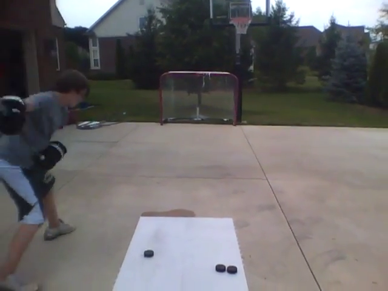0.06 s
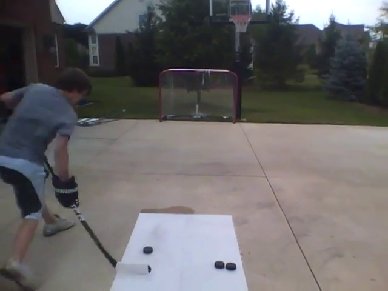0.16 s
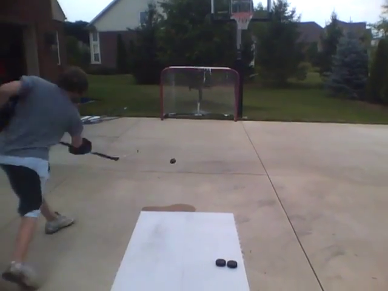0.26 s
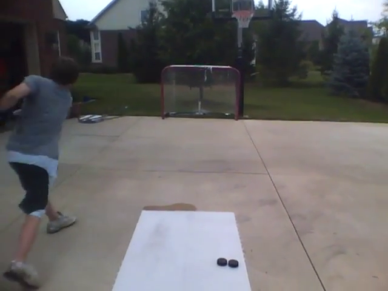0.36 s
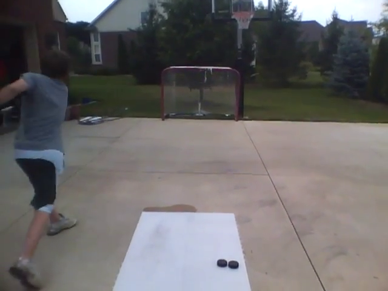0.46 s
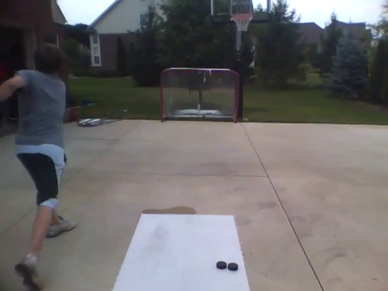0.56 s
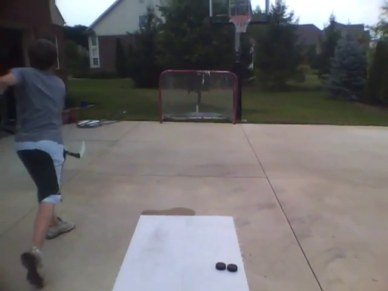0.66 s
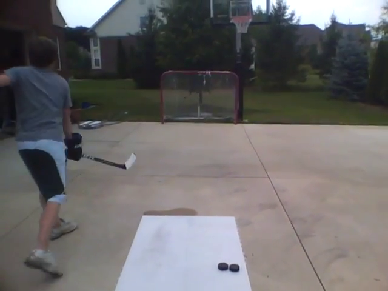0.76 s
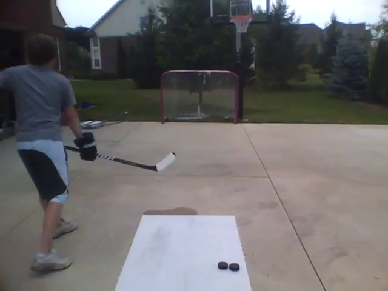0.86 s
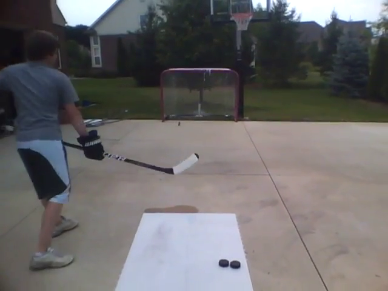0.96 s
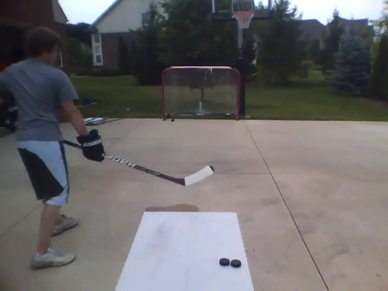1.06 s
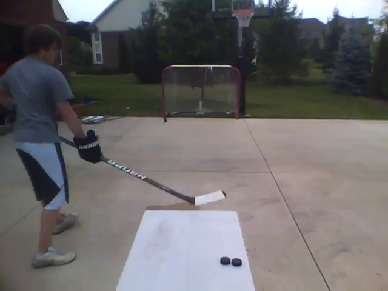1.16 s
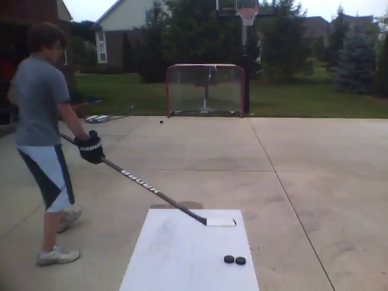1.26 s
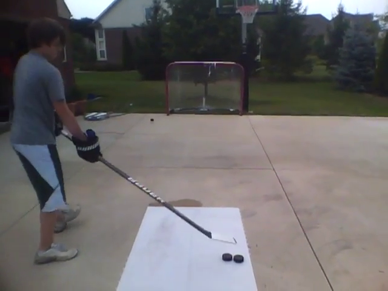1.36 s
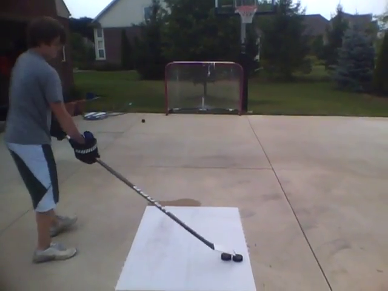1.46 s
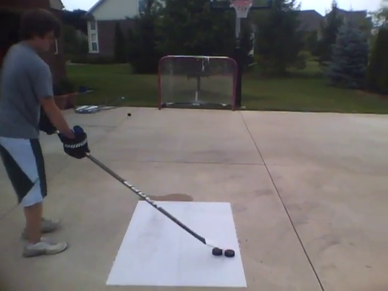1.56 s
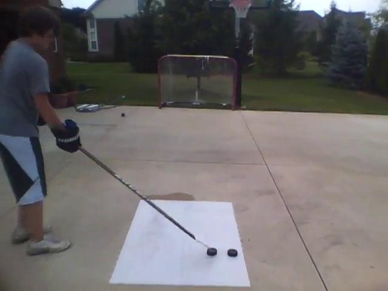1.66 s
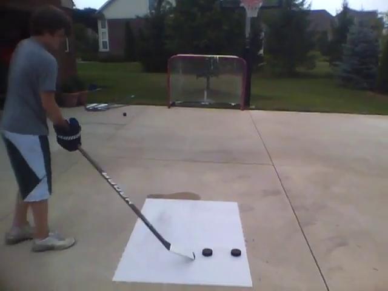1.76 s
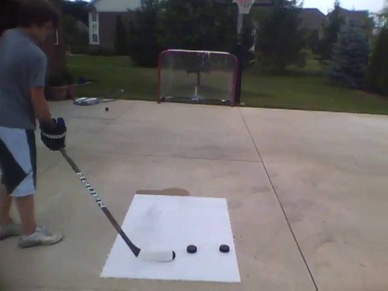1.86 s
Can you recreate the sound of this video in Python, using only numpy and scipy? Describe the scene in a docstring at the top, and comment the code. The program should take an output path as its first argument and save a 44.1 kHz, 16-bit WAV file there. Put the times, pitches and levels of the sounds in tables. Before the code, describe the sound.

A hockey slap shot cracks very loudly and distorts the microphone, ringing off walls and yard; shoes scuff and squeak on concrete, then the blade knocks hollowly on the plastic pad and slides a puck.

```python
"""Driveway: a slap shot cracks off a plastic pad and overloads the input; walls, yard and far houses answer.
Shoes scuff, thud and squeak on the concrete, with sharp clicks and ticks of grit.
Then the blade knocks on the pad, which chatters hollowly, and the next puck slides across it.
Impacts are filtered noise bursts plus decaying sines; friction is grainy noise; air and wind are steady noise."""
import sys
import numpy as np
from scipy import signal
from scipy.io import wavfile
from scipy.ndimage import uniform_filter1d

SR = 44100
rng = np.random.default_rng(int(sys.argv[2]) if len(sys.argv) > 2 else 0)


def master_out(mix):
    """Clip the mix to full scale and print it as 16-bit PCM to the path in sys.argv[1]."""
    frames = np.transpose(np.atleast_2d(mix))
    ceiling = np.clip(frames, -1, 1)
    pcm = np.round(ceiling * 32767).astype(np.int16)
    wavfile.write(sys.argv[1], SR, pcm)


N = 83790
TIME = np.arange(N) / SR


def amp(db):
    """Decibels to gain."""
    return 10 ** (np.asarray(db) / 20)


def noise():
    """White noise of unit variance."""
    return rng.standard_normal(N)


def read(points, hz):
    """Interpolates a table on a log-frequency axis."""
    f, value = np.transpose(points)
    return np.interp(np.log(hz + 1), np.log(f + 1), value)


def add(mix, start_s, sound):
    """Adds a sound into the mix in place, cut at the end."""
    part = mix[max(round(start_s * SR), 0):][:len(sound)]
    part += sound[:len(part)]


def colour(x, spectrum, size=4096):
    """Minimum-phase filter with the given spectrum and unit energy."""
    hz = abs(np.fft.fftfreq(size, 1 / SR))
    log_gain = np.log(amp(read(spectrum, hz)))
    response = np.exp(np.conj(signal.hilbert(log_gain)))
    taps = np.fft.ifft(response).real[:size // 2]
    return signal.fftconvolve(x, taps / np.linalg.norm(taps))[:len(x)]


def fade(t60_s, t=TIME):
    """Exponential decay, 60 dB down at t60."""
    return np.exp(-np.log(1000) * t / np.maximum(t60_s, 1e-4))


def burst(t60_s, spectrum):
    """Impact noise: one decay for all bands, then coloured."""
    return colour(noise() * fade(t60_s), spectrum)


def dying(t60_table, size=256):
    """Noise in which each band decays at its own rate."""
    hz, t, bands = signal.stft(noise(), SR, nperseg=size)
    bands = bands * fade(read(t60_table, hz)[:, None], t)
    return signal.istft(bands, SR, nperseg=size)[1][:N]


CONTACT_S = 0.00051  # time constant of the onset


def ring(modes):
    """Struck body: decaying sines in random phase, softened by the contact time."""
    sound = np.zeros(N)
    for hz, db, t60_s in modes:
        sound += amp(db) * fade(t60_s) * np.sin(2 * np.pi * (hz * TIME + rng.random()))
    return sound * (1 - np.exp(-TIME / CONTACT_S))


def swell(length_s):
    """Rounded rise and fall of a stroke."""
    return np.sin(np.pi * np.arange(0, length_s, 1 / SR) / length_s).clip(0) ** .7


GRAIN_DB = 3  # spread of grain levels before they are clipped at two deviations


def rub(length_s, spectrum, grain_samples=24):
    """Friction stroke: noise stepped in level grain by grain, then coloured."""
    grain_db = GRAIN_DB * rng.standard_normal(N // grain_samples + 1).clip(-2, 2)
    grains = np.repeat(amp(grain_db), grain_samples)[:N]
    grains /= np.sqrt(np.mean(grains ** 2))
    stroke = np.zeros(N)
    add(stroke, 0, swell(length_s))
    return colour((stroke * noise() * grains)[:SR // 2], spectrum)


def push(rise_s):
    """Short envelope that peaks at one after the rise time."""
    u = TIME / rise_s
    return u ** 2 * np.exp(2 * (1 - u))


def thud(hz, db, rise_s):
    """Low impact: a sine under a brief push."""
    return amp(db) * push(rise_s) * np.sin(2 * np.pi * hz * TIME)


# outdoor hiss: (frequency [Hz], relative level [dB])
AIR_SPECTRUM = [(15, -25), (25, -3), (102, -10), (149, -21), (293, -6), (607, -17), (754, -12), (988, -18),
                (2910, -19), (3160, -16.5), (16000, -31)]
AIR_DB = -52
# low wind rumble: (time [s], level [dB])
WIND_LEVEL = [(0, -47.5), (.6, -48), (1.05, -52.5), (1.4, -58.5), (1.9, -54.5)]
# wind spectrum: (frequency [Hz], relative level [dB])
WIND_SPECTRUM = [(20, -6), (70, 0), (130, -5), (250, -20), (800, -40)]


def air():
    """Steady coloured hiss plus low wind noise that drifts in level."""
    level_db = np.interp(TIME, *np.transpose(WIND_LEVEL))
    wind = amp(level_db) * colour(noise(), WIND_SPECTRUM)
    return amp(AIR_DB) * colour(noise(), AIR_SPECTRUM) + wind


# shoes scraping on concrete: (time [s], length [s], scuff level [dB], rasp centre [Hz],
#                              rasp level [dB], sole level [dB])
SCUFFS = [(.003, 0.072, -37, 1350, -35, -51.5), (.01, .056, -31, 3400, -25, -56),
          (0.129, 0.12, -44, 3800, -39, -45), (.535, 0.088, -38.5, 4000, -43, -38.5),
          (0.653, .058, -33.5, 990, -37, -32), (.861, 0.033, -43.5, 1080, -42, -35),
          (0.889, 0.057, -38.5, 3480, -33.5, -43), (0.994, 0.03, -55, 503, -53, -46)]
# broad scrape: (frequency [Hz], relative level [dB])
SCUFF_SPECTRUM = [(100, -14), (600, -11), (1200, 3), (2000, -1.5), (3500, -3.5), (5200, -8), (6500, -12.5),
                  (10500, -14.5), (16000, -29)]
# low rub of the sole: (frequency [Hz], relative level [dB])
SOLE_SPECTRUM = [(30, -6), (120, -5.5), (300, -0.5), (500, -11), (1000, -14.5), (3000, -60)]
RASP_OCTAVES = 0.45  # distance from the centre to half amplitude


def scuffs():
    """Soles rub gritty concrete: broad scrape, narrower rasp and low sole noise."""
    out = np.zeros(N)
    grid_hz = np.geomspace(100, 16000, 60)
    for s, length_s, scuff_db, rasp_hz, rasp_db, sole_db in SCUFFS:
        octaves = np.log2(grid_hz / rasp_hz)
        rasp_spectrum = np.c_[grid_hz, -20 * np.log10(1 + abs(octaves / RASP_OCTAVES) ** 3)]
        add(out, s, amp(scuff_db) * rub(length_s, SCUFF_SPECTRUM))
        add(out, s, amp(rasp_db) * rub(length_s, rasp_spectrum))
        add(out, s, amp(sole_db) * rub(length_s, SOLE_SPECTRUM))
    return out


# tiny high ticks of grit: (time [s], level [dB])
GRIT_TICKS = [(0.073, -41), (.534, -31.5), (.999, -47)]
# (frequency [Hz], relative level [dB])
GRIT_SPECTRUM = [(1000, -28), (5500, -10.5), (8000, 5.5), (12000, -5), (16000, -6)]
GRIT_T60_S = .014


def grit():
    """Grit ticks: brief treble noise bursts."""
    out = np.zeros(N)
    for s, db in GRIT_TICKS:
        add(out, s, amp(db) * burst(GRIT_T60_S, GRIT_SPECTRUM))
    return out


# soft thuds of feet: (time [s], frequency [Hz], level [dB], rise [s])
FOOT_THUDS = [(0.098, 89.6, -40, 0.0049), (.128, 95, -33.5, 0.0028), (0.418, 109.7, -32, 0.0078),
              (0.472, 104, -26.5, 0.0024), (0.517, 136, -23.5, 0.0051), (.63, 40, -33, 0.0043),
              (.671, 327, -24, 0.0018), (0.694, 109.2, -40, .003), (.77, 315, -34.5, .002),
              (0.861, 295, -28.5, 0.0036), (.944, 150, -21, 0.004), (1.258, 336, -35, 0.0015),
              (1.277, 923, -37, 0.0011), (1.315, 164, -26, 0.0028), (1.425, 286, -43, 0.0023)]


def foot_thuds():
    """Feet land softly: one brief sine push each."""
    out = np.zeros(N)
    for s, hz, db, rise_s in FOOT_THUDS:
        add(out, s, thud(hz, db, rise_s))
    return out


# sharp clicks of stick and grit: (time [s], noise level [dB], ring frequency [Hz],
#                                  ring level [dB], ring t60 [s])
CLICKS = [(0.1918, -25, 3800, -16, 0.0095), (0.5821, -15.5, 5000, -15, .01), (.583, -20, 2030, -15, .022),
          (0.596, -33, 1690, -29, .015), (1.466, -33, 4450, -25, .009), (1.4755, -32, 4750, -26, .009)]
# (frequency [Hz], relative level [dB])
CLICK_SPECTRUM = [(300, -14), (1800, 4), (5000, 3.5), (7500, -5.5), (11000, -12.5), (16000, -22)]
CLICK_T60_S = 0.011


def clicks():
    """Hard little contacts: a noise burst and one brief mode each."""
    out = np.zeros(N)
    for s, db, hz, ring_db, t60_s in CLICKS:
        add(out, s, amp(db) * burst(CLICK_T60_S, CLICK_SPECTRUM))
        add(out, s, ring([(hz, ring_db, t60_s)]))
    return out


# modes of the free stick: (frequency [Hz], relative level [dB], t60 [s])
STICK_MODES = [(478, -2, .22), (862, -3, .25), (937, -3, .25), (1085, -3, .25), (1181, 0, .3),
               (1384, -2, .25), (1474, 0, .27), (1533, -1, .3), (1798, -1, .3), (2087, -3, .28),
               (2149, 0, .33), (2274, 0, .3), (2343, -3, .3), (2835, -2, .35), (3063, -1, .26),
               (3300, -4, .2), (3637, -1, .3), (3789, 2, .3), (4284, -6, .3), (5178, -7, .3)]


def stick_ring():
    """The stick's struck modes, ringing freely."""
    return ring(STICK_MODES)


# blade on pad and puck: (time [s], level [dB], t60 [s])
STRIKES = [(.2302, 9.5, .05), (0.2434, 10, 0.072), (.256, 1.5, 0.085)]
# (frequency [Hz], relative level [dB])
STRIKE_SPECTRUM = [(60, -32.5), (250, -8.5), (500, -7), (1000, -1.5), (2000, -4), (3700, -4), (5000, -17.5),
                   (9000, -20), (16000, -29.5)]
SHOT_S = STRIKES[0][0]
PUSH_HZ, PUSH_DB, PUSH_RISE_S = 89, -2.5, 0.0046  # boom of the blade slapping the pad
SHOT_STICK_DB = -13.5


def crack():
    """Blade, pad and puck collide: noise bursts, a low push and the ringing stick."""
    out = np.zeros(N)
    for s, db, t60_s in STRIKES:
        add(out, s, amp(db) * burst(t60_s, STRIKE_SPECTRUM))
    add(out, SHOT_S, thud(PUSH_HZ, PUSH_DB, PUSH_RISE_S))
    add(out, SHOT_S, amp(SHOT_STICK_DB) * stick_ring())
    return out


# yard tail: (frequency [Hz], relative level [dB])
NEAR_SPECTRUM = [(60, -14.5), (250, -8), (500, -12), (900, 0), (2000, -3.5), (3700, 1), (5500, -4),
                 (9000, -5.5), (16000, -29)]
# (frequency [Hz], t60 [s])
NEAR_T60 = [(100, 0.34), (1000, 0.66), (3500, 0.6), (8000, 0.38), (16000, 0.34)]
# tail from distant houses: (frequency [Hz], relative level [dB])
FAR_SPECTRUM = [(60, -13.5), (250, -4), (550, -5.5), (1100, 1), (2300, -0.5), (4000, -8), (7000, -17),
                (16000, -32)]
# (frequency [Hz], t60 [s])
FAR_T60 = [(100, 2.3), (1200, 2.06), (3500, 1.93), (10000, 1.6)]
NEAR_DB, FAR_DB = -7.5, -26.5
TAIL_RISE_S = 0.012  # time constant


def shot_tails():
    """Yard and distant houses return the shot as noise dying band by band."""
    out = np.zeros(N)
    near = amp(NEAR_DB) * colour(dying(NEAR_T60), NEAR_SPECTRUM)
    far = amp(FAR_DB) * colour(dying(FAR_T60), FAR_SPECTRUM)
    add(out, SHOT_S, (near + far) * (1 - np.exp(-TIME / TAIL_RISE_S)))
    return out


# modes of the pad: (frequency [Hz], relative level [dB], t60 [s])
PAD_MODES = [(327, -6, .06), (450, -2, .075), (600, -8, .06), (790, -7, .05), (915, -8, .05),
             (1085, -5, .05), (1205, -5, .04), (1375, -8, .04), (1548, -11, .06), (2500, -17, .04)]


def pad_ring():
    """The pad's short hollow modes."""
    return ring(PAD_MODES)


SHOT_PAD_S, SHOT_PAD_DB = .258, -8.5


def pad_slap():
    """The pad slaps back on the concrete and rings."""
    out = np.zeros(N)
    add(out, SHOT_PAD_S, amp(SHOT_PAD_DB) * pad_ring())
    return out


# loose pad on concrete after a blow: (time [s], length [s], level [dB])
CHATTERS = [(.256, .032, -12), (1.5135, .03, -24), (1.783, .031, -23)]
# (frequency [Hz], relative level [dB])
CHATTER_SPECTRUM = [(60, -35), (180, -11), (300, -2), (460, 0), (680, -2), (900, -1), (1250, -1),
                    (1800, -18), (4000, -32), (16000, -60)]


def chatter():
    """The loose pad chatters on the concrete: short grainy noise strokes."""
    out = np.zeros(N)
    for s, length_s, db in CHATTERS:
        add(out, s, amp(db) * rub(length_s, CHATTER_SPECTRUM))
    return out


# echoes of the shot from nearby walls: (time [s], level [dB], length [s])
WALL_ECHOES = [(0.279, -8, .027), (0.321, -15, 0.022)]
# (frequency [Hz], relative level [dB])
ECHO_SPECTRUM = [(100, -31.5), (500, -11), (1200, -3.5), (2500, -1.5), (4000, 1), (5300, -8.5), (6200, -17),
                 (9500, -16.5), (16000, -31)]


def wall_echoes():
    """Walls throw the shot back as short smeared noise strokes."""
    out = np.zeros(N)
    for s, db, length_s in WALL_ECHOES:
        add(out, s, amp(db) * rub(length_s, ECHO_SPECTRUM))
    return out


SQUEAK_S, SQUEAK_DB, SQUEAK_RISE_S = .8925, -17, 0.003
SQUEAK_START_HZ, SQUEAK_END_HZ, SQUEAK_GLIDE_S = 5290, 3230, 0.00377  # glide: time constant
SQUEAK_ROUGH = .12  # RMS pitch jitter, as a fraction of the pitch


def squeak():
    """A rubber sole sticks and slips: a brief sine of falling, jittered pitch."""
    out = np.zeros(N)
    fall_hz = SQUEAK_START_HZ - SQUEAK_END_HZ
    hz = SQUEAK_END_HZ + fall_hz * np.exp(-TIME / SQUEAK_GLIDE_S)
    jitter = uniform_filter1d(noise(), size=12)
    turns = np.cumsum(hz * (1 + SQUEAK_ROUGH * jitter / jitter.std())) / SR
    add(out, SQUEAK_S, amp(SQUEAK_DB) * push(SQUEAK_RISE_S) * np.sin(2 * np.pi * turns))
    return out


# blade and puck on the pad: (time [s], pad ring level [dB], stick ring level [dB],
#                             clack level [dB], tick level [dB])
KNOCKS = [(1.5122, -32, -60, -27, -22), (1.5143, -12, -38, -18.5, -37.5), (1.523, -22, -48, -25, -41),
          (1.532, -15, -49, -27.5, -45), (1.6465, -31.5, -30.5, -23.5, -10.5),
          (1.6636, -31, -38.5, -27.5, -29), (1.78, -14, -27.5, -15.5, -11), (1.798, -19.5, -46, -22.5, -16),
          (1.859, -42, -45, -42, -42)]
# (frequency [Hz], relative level [dB])
CLACK_SPECTRUM = [(100, -34.5), (300, -1.5), (900, 3.5), (1500, -4.5), (2000, -1), (3000, 1.5), (4500, -11),
                  (8000, -23), (16000, -42)]
# (frequency [Hz], t60 [s])
CLACK_T60 = [(300, 0.16), (1500, 0.04), (4000, 0.031), (12000, 0.1)]
# (frequency [Hz], relative level [dB])
TICK_SPECTRUM = [(200, -16), (1000, -5), (3500, 6), (7000, -8.5), (11000, -15.5), (16000, -38)]
TICK_T60_S = 0.0027
GRIP_T60_S = 0.061  # added damping: the stick is pressed on the pad


def knocks():
    """Each contact ticks, clacks and rings the pad and the damped stick."""
    out = np.zeros(N)
    stick = stick_ring() * fade(GRIP_T60_S)
    for s, pad_db, stick_db, clack_db, tick_db in KNOCKS:
        add(out, s, amp(pad_db) * pad_ring())
        add(out, s, amp(stick_db) * stick)
        add(out, s, amp(clack_db) * colour(dying(CLACK_T60), CLACK_SPECTRUM))
        add(out, s, amp(tick_db) * burst(TICK_T60_S, TICK_SPECTRUM))
    return out


# puck sliding on the pad: (time [s], length [s], level [dB])
SLIDES = [(1.671, 0.12, -41.5), (1.81, 0.08, -40)]
# (frequency [Hz], relative level [dB])
SLIDE_SPECTRUM = [(100, -13), (400, -4.5), (900, 2), (1600, -4), (3000, -6), (6000, -16.5), (16000, -29)]


def puck_slides():
    """The puck rubs across the pad: grainy noise strokes."""
    out = np.zeros(N)
    for s, length_s, db in SLIDES:
        add(out, s, amp(db) * rub(length_s, SLIDE_SPECTRUM))
    return out


PAD_LOW_HZ = 190


def pad_highpass(sound):
    """High-pass: the pad sounds carry little bass."""
    return signal.sosfilt(signal.butter(2, PAD_LOW_HZ, "high", fs=SR, output="sos"), sound)


YARD_DB, YARD_T60_S = -13, 0.28


def yard(sound):
    """Faint yard reverberation: convolution with decaying noise of unit energy."""
    tail = noise() * fade(YARD_T60_S)
    return amp(YARD_DB) * signal.fftconvolve(sound, tail / np.linalg.norm(tail))[:N]


def scene():
    """Air, the shot with its reflections, and the small sounds with a yard tail."""
    feet = scuffs() + foot_thuds() + squeak()
    pad = pad_highpass(chatter() + knocks() + puck_slides())
    small = feet + grit() + clicks() + pad
    shot = crack() + shot_tails() + pad_slap() + wall_echoes()
    return (air() + shot + small + yard(small))[None]


EDGE_HZ = 16000


def record(dry):
    """The input clips at full scale; a linear-phase low-pass then limits the band."""
    clipped = np.clip(dry, -1, 1)
    taps = signal.firwin(255, EDGE_HZ, window=("kaiser", 8), fs=SR)
    return signal.oaconvolve(clipped, taps[None], "same")


dry = scene()
out = record(dry)
master_out(out)
```